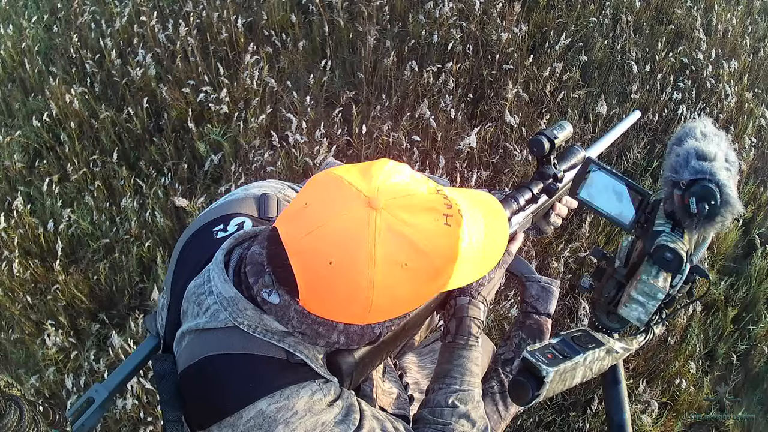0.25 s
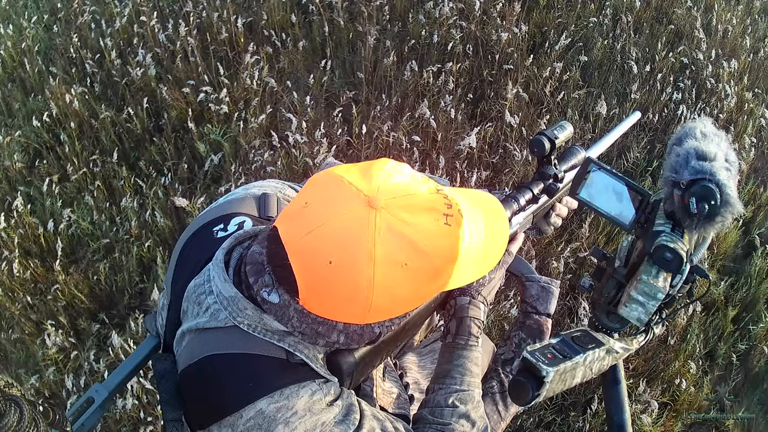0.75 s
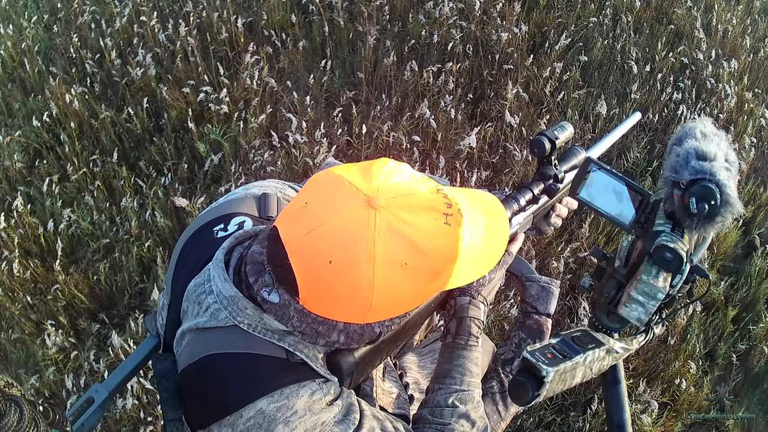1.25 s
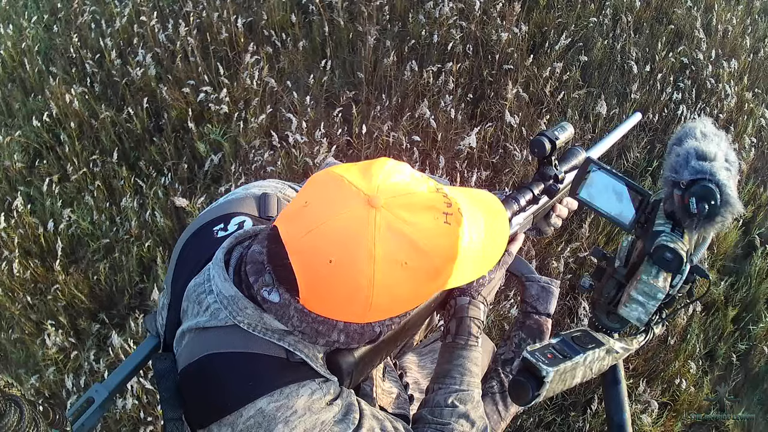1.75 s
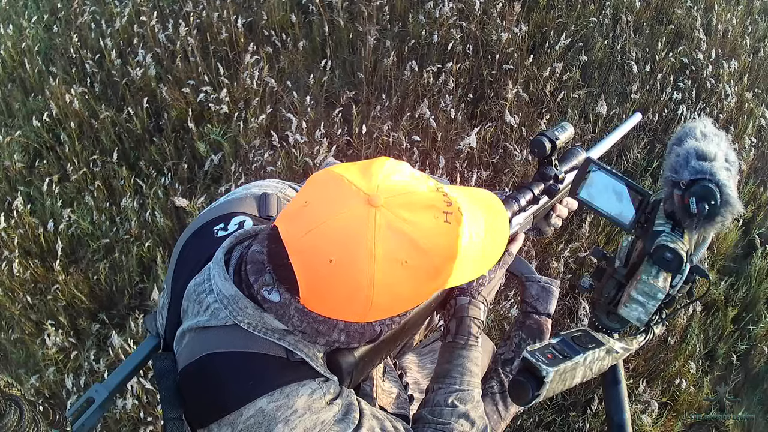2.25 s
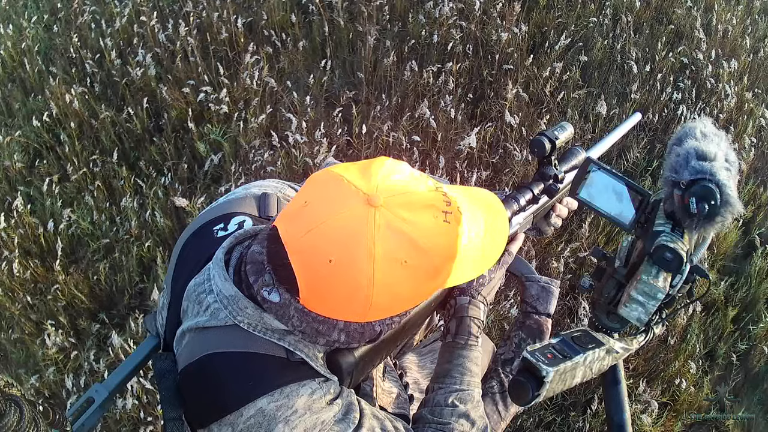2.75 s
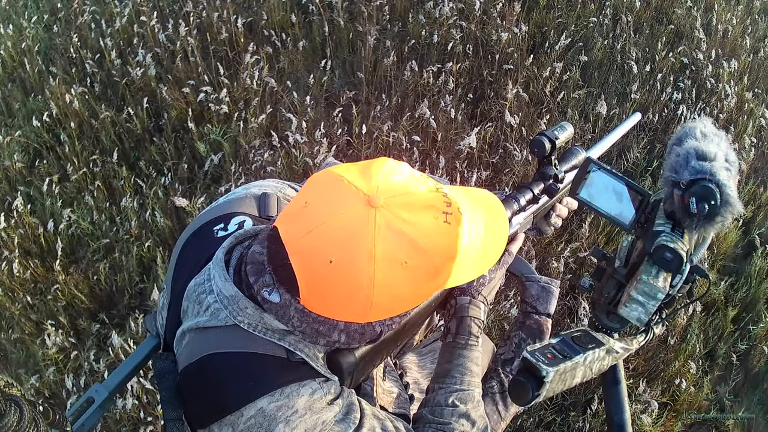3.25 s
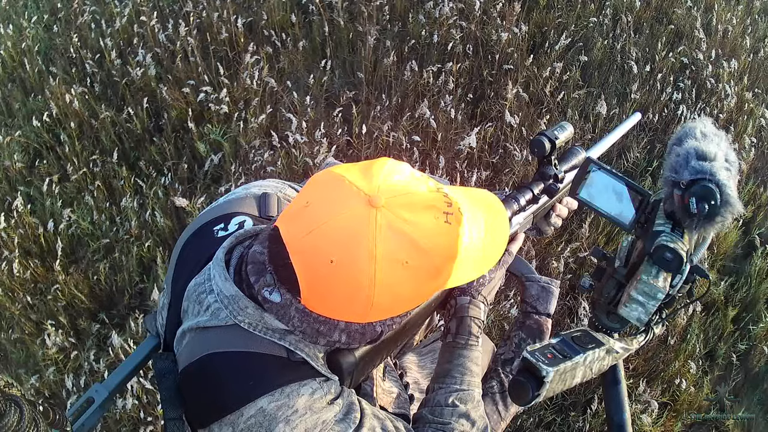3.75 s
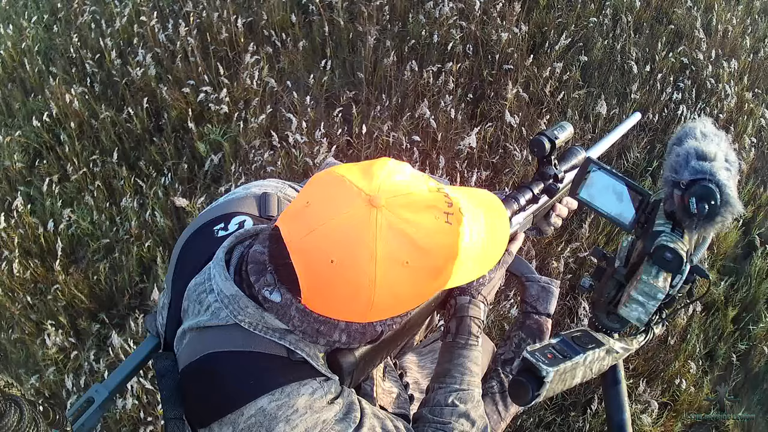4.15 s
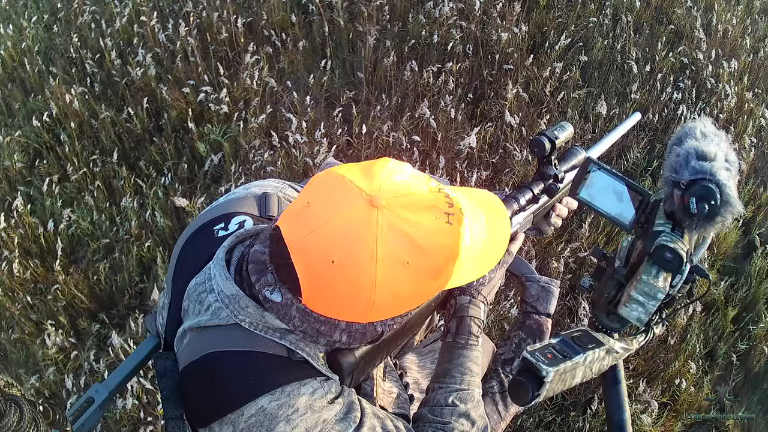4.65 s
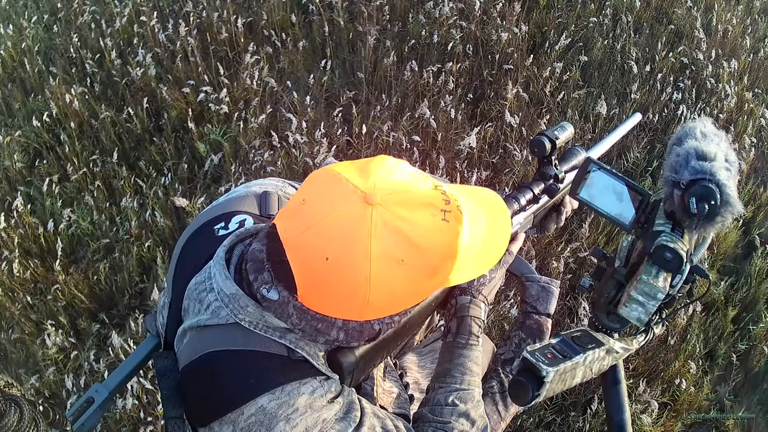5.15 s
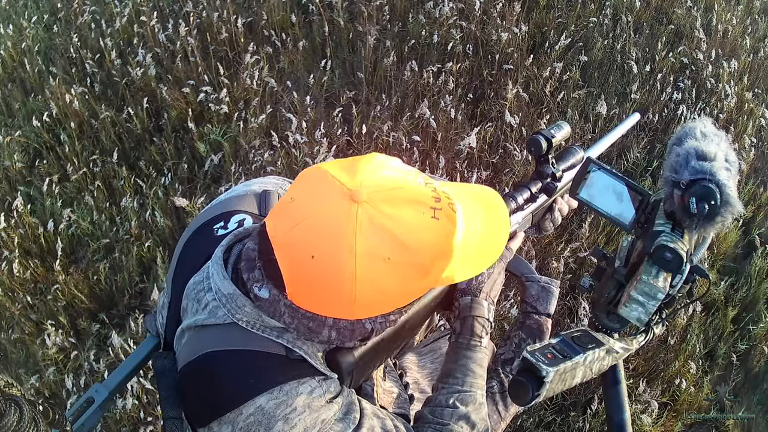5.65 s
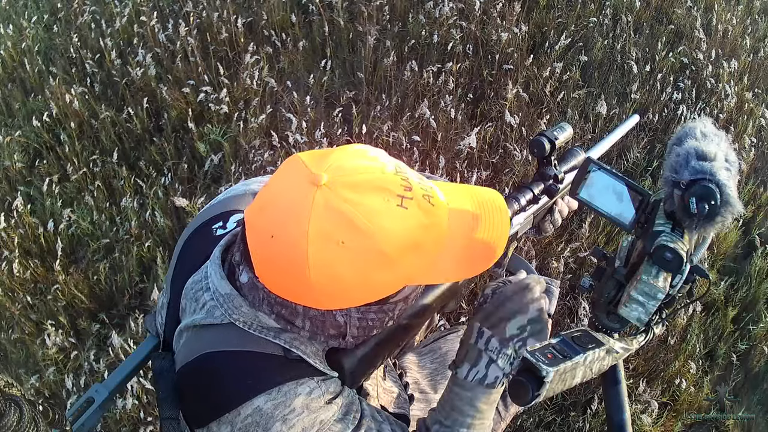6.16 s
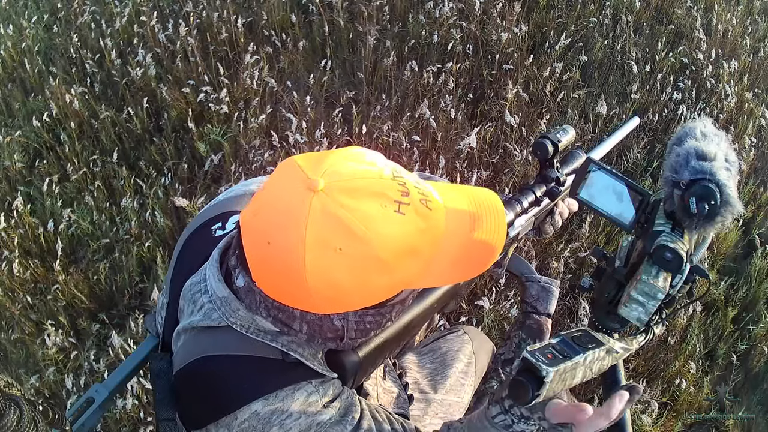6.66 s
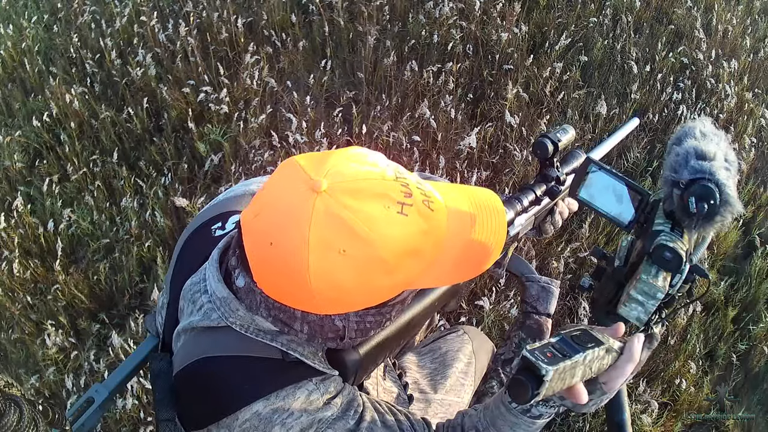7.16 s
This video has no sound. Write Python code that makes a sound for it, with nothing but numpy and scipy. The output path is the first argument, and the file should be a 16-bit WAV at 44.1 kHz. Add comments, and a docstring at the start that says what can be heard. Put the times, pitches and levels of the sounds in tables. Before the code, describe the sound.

Outdoors in a grassy marsh, many birds chip, chuck, whistle and trill near and far, blurred slightly by reeds. Low wind rumble and faint hush stay underneath. After about five seconds, dry clicks and sleeve rustle come very close to the microphone, then hollow knocks, and finally deep thumps shake the mount and overload the input.

```python
"""Marsh birds at dusk

An open marsh heard by a small camera on a tripod, with light wind rumbling on its microphone.
Near birds chip, chuck and whistle with gliding tones, rasp with filtered noise, and trill and buzz
with pulsed tones; the reeds blur them over a far chorus of small whistles and shaped noise.
A hand clicks and scrapes on the gear with short noise bursts and grainy hiss, then knocks the tripod,
which rocks the microphone as a slow, strong sine and overloads the input."""
import sys
import numpy as np
from scipy import signal
from scipy.fft import rfft, irfft, next_fast_len
from scipy.io import wavfile
from scipy.ndimage import uniform_filter1d, map_coordinates

SR = 44100
rng = np.random.default_rng(int(sys.argv[2]) if len(sys.argv) > 2 else 0)


def gain_from_db(level_db):
    """Convert decibel levels to linear amplitude factors (20 dB per decade)."""
    decades = np.asarray(level_db, float) / 20
    return 10 ** decades


def persist_wave(psi):
    """Save psi, clipped to +-1, as 16-bit WAV."""
    counts = np.round(np.clip(psi, -1, 1) * 32767).astype(np.int16)
    wavfile.write(sys.argv[1], SR, np.atleast_2d(counts).T)


N = 327206  # samples in the scene


def unit(x):
    """Scales x to rms 1."""
    return x / np.sqrt(np.mean(x ** 2) + 1e-20)


def along(points, hz):
    """Reads a curve of (hz, value) points on a log frequency axis."""
    f, v = np.transpose(points)
    return np.interp(np.log(hz + 1), np.log(f + 1), v)


def curves(rows):
    """Draws one value per sample for each column after the time."""
    s, *cols = np.transpose(rows)
    return [np.interp(np.arange(N) / SR, s, c) for c in cols]


def wobble(rate, n=N):
    """A smooth random curve with rate knots a second."""
    knots = rng.standard_normal(int(n * rate / SR) + 4)
    return map_coordinates(knots, [np.arange(n) * rate / SR])


def filtered(x, response):
    """Shapes x by a gain that is a function of frequency."""
    m = next_fast_len(len(x) + 8192)
    gain = response(np.fft.rfftfreq(m, 1 / SR))
    return irfft(rfft(x, m) * gain, m)[:len(x)]


def band(x, hz, width_hz):
    """Passes x through one rounded resonance, scaled to rms 1."""
    return unit(filtered(x, lambda f: np.exp(-2 * ((f - hz) / width_hz) ** 2)))


def rush(spectrum, patchy_db):
    """Shaped noise of rms 1, with patches of random gain in time and frequency."""
    z = signal.stft(rng.standard_normal(N + 512), nperseg=512)[2]
    field = rng.standard_normal(z.shape)
    field = uniform_filter1d(uniform_filter1d(field, 5, 0), 12, 1)
    patchy = signal.istft(z * gain_from_db(patchy_db * unit(field)), nperseg=512)[1][:N]
    return unit(filtered(patchy, lambda hz: gain_from_db(along(spectrum, hz))))


def add(track, s, x):
    """Mixes x into track from time s."""
    part = track[max(round(s * SR), 0):][:len(x)]
    part += x[:len(part)]


def span(length_s):
    """Progress from 0 to 1 over a note."""
    return np.linspace(0, 1, max(round(length_s * SR), 8))


def swell(u, edge):
    """Rises and falls over the share edge at each end."""
    return np.sin(np.pi / 2 * np.clip(np.minimum(u, 1 - u) / np.clip(edge, .02, .5), 0, 1)) ** 2


def note(length_s, start_hz, middle_hz, end_hz, flutter_db, flutter_rate, edge):
    """A syrinx tone on a parabola through three pitches, unsteady in level."""
    u = span(length_s)
    hz = start_hz * (1 - u) * (1 - 2 * u) + 4 * middle_hz * u * (1 - u) + end_hz * u * (2 * u - 1)
    hz = hz * (1 + .012 * wobble(60, len(u)))  # the pitch is never quite steady
    tone = np.sin(2 * np.pi * np.cumsum(hz) / SR)
    flutter = gain_from_db(flutter_db * wobble(flutter_rate, len(u)))
    return swell(u, edge) * flutter * tone


def breathy(tone, share):
    """Fuzzes a tone with noise around its pitch by a fast random change of level."""
    return tone * (1 + share * wobble(500, len(tone)))


# Strength of the wind on the microphone port: start_s, level_db
WIND_LEVEL = [(0, -24), (2, -24), (4, -26), (4.9, -27), (5.4, -25), (6.7, -22), (7.0, -24), (7.1, -32)]
# Colour of the buffeting: frequency_hz, relative_level_db (per Hz)
BUFFET_COLOUR = [(2.5, -22), (6, -5), (11, 0), (19, 0), (25, -10), (32, -17), (48, -17), (120, -36),
                 (260, -120)]


def buffeting():
    """Wind on the port makes a low rumble with slow lumps of level."""
    lumps = gain_from_db(0.81 * wobble(8.8))
    return gain_from_db(curves(WIND_LEVEL)[0]) * unit(lumps * rush(BUFFET_COLOUR, patchy_db=1.5))


# Colour of grass, far water and microphone hiss together: frequency_hz, relative_level_db (per Hz)
AIR_COLOUR = [(35, -44.5), (60, -0.5), (130, -8.5), (147, -8), (165, -11), (189, -13), (636, -22),
              (903, -18.5), (1860, -28.5), (2350, -37), (2710, -24), (3420, -44), (4530, -34.5),
              (14900, -39.5), (16000, -46)]


def marsh_air():
    """The steady hush of the marsh is shaped, faintly patchy noise."""
    return gain_from_db(-40) * rush(AIR_COLOUR, patchy_db=0.73)


# Level of the far birds: start_s, level_db
CHORUS_LEVEL = [(0, -40.5), (.54, -41), (.95, -38.5), (1.4, -43), (1.55, -44.5), (2.4, -41), (2.89, -43),
                (3.51, -42), (4.3, -45.5), (4.46, -48.5), (5.31, -40.5), (5.45, -45), (5.6, -41.5),
                (6.61, -44.5), (6.88, -42), (7.42, -54)]
# Colour of the far birds: frequency_hz, relative_level_db (per Hz in the noise)
CHORUS_COLOUR = [(900, -12), (1500, -8), (2200, -3.5), (3000, 1), (3800, -5.5), (4600, -13), (6500, -19.5),
                 (8000, -35)]


def chorus(count=420):
    """Many far birds: short random whistles blurring into a patchy band."""
    whistling = np.zeros(N)
    for place, pitch, life, bend in rng.random((count, 4)):
        hz = 1200 * 3.6 ** pitch
        length_s = 0.0212 + 0.0555 * life
        start_hz, end_hz = hz * (.95 + 0.1044 * bend), hz * (1.04 - 0.093 * bend)
        whistle = note(length_s, start_hz, hz, end_hz, 3.32, 78.0, 0.507)
        add(whistling, place * N / SR, gain_from_db(along(CHORUS_COLOUR, hz)) * whistle)
    blend = .35 * unit(whistling) + rush(CHORUS_COLOUR, patchy_db=2.2)
    return gain_from_db(curves(CHORUS_LEVEL)[0]) * unit(blend)


def chuck(length_s, start_hz, end_hz):
    """A second voice chops a straight glide into strands; the glide grows louder as it climbs."""
    glide = note(length_s, start_hz, (start_hz + end_hz) / 2, end_hz, 2.5, 400, .35)
    glide = glide * (.4 + .6 * span(length_s))
    return glide * (.6 + np.cos(2 * np.pi * 420 * np.arange(len(glide)) / SR))


# Quick hoarse upward chucks: start_s, length_s, start_hz, end_hz, level_db
CHUCK_NOTES = [(.005, .02, 1933, 2250, -34), (.897, .008, 3100, 3880, -33), (1.029, 0.029, 760, 2400, -31),
               (1.043, 0.0178, 3300, 3610, -26.5), (1.786, .018, 2760, 3460, -38),
               (1.994, 0.012, 1513, 2300, -32), (2.064, .017, 1970, 4070, -25.5),
               (2.763, 0.011, 1950, 3150, -31), (3.501, .025, 1876, 3840, -30.5),
               (4.32, .02, 1510, 3770, -25.5), (4.323, .013, 2420, 4600, -27),
               (4.508, .022, 1296, 4410, -27), (6.147, 0.013, 1470, 2500, -34)]


def chucks():
    """Hoarse upward glides, each chopped by a second voice."""
    out = np.zeros(N)
    for s, length_s, start_hz, end_hz, db in CHUCK_NOTES:
        add(out, s, gain_from_db(db) * chuck(length_s, start_hz, end_hz))
    return out


# Whistles: start_s, length_s, pitch_hz, slide_hz (end minus start), level_db
WHISTLE_NOTES = [(.005, 0.036, 1320, 0, -41), (0.048, 0.049, 1330, -210, -40), (.14, 0.04, 2860, -80, -40),
                 (.25, .063, 2850, 0, -40.5), (0.348, .077, 1720, 0, -44), (0.361, 0.087, 1960, 30, -49),
                 (.5, .1, 3720, -560, -49), (.555, 0.059, 3187, -42, -39), (0.56, .136, 1324, -170, -38.5),
                 (0.717, .04, 1940, 60, -43), (.765, 0.054, 1566, -95, -39.5),
                 (0.785, 0.056, 3020, -60, -38), (0.828, 0.044, 1740, 100, -42),
                 (0.858, .042, 1422, -55, -41.5), (1.088, .03, 4670, -120, -52),
                 (1.273, 0.045, 4590, -140, -53), (1.365, .054, 4600, -180, -54),
                 (1.47, .08, 4520, -270, -53), (1.496, .074, 2970, 20, -39.5), (1.9, 0.12, 1950, -100, -51),
                 (2.129, 0.11, 1537, -230, -40), (2.245, 0.08, 2070, -170, -42),
                 (2.788, 0.104, 3270, 100, -39), (2.903, 0.085, 1997, 164, -49),
                 (4.233, .05, 3768, -65, -34), (4.64, .09, 2140, -100, -52),
                 (4.673, 0.041, 4000, -165, -48.5), (4.732, 0.14, 2005, -72, -46),
                 (4.989, .082, 1070, -17, -41.5), (5.082, 0.1, 2140, -290, -44.5),
                 (5.435, .034, 7250, -150, -52), (5.577, .077, 3060, -51, -40),
                 (7.402, 0.019, 1330, 591, -34.5)]


def whistles():
    """Clear syrinx tones that slide evenly, with some breath around them."""
    out = np.zeros(N)
    for s, length_s, hz, slide_hz, db in WHISTLE_NOTES:
        tone = note(length_s, hz - slide_hz / 2, hz, hz + slide_hz / 2, 2.2, 110, .17)
        add(out, s, gain_from_db(db) * breathy(tone, .35))
    return out


# Fading of the reed beds: frequency_hz, t60_s
REED_FADE = [(1000, 0.58), (6000, .75), (12000, .15)]


def reeds(x, count=30):
    """Near stems smear calls over a few ms and reed beds add a fading blur.
    The blur is built from overlapping random tails, so no pitch is favoured for long."""
    out, hop = np.zeros(N), N // count
    for start in range(0, N - hop, hop):
        hz, t, z = signal.stft(rng.standard_normal(SR // 2), SR, nperseg=256)
        beds = gain_from_db(-60 * t / along(REED_FADE, hz)[:, None])
        stems = gain_from_db(8 - 60 * t / 0.037)
        tail = signal.istft(z * (beds + stems), SR, nperseg=256)[1]
        # overlapping pieces crossfade from one random tail to the next
        piece = x[start:start + 2 * hop] * np.hanning(2 * hop)[:N - start]
        add(out, start / SR + .003, signal.fftconvolve(piece, tail / np.linalg.norm(tail)))
    return out


# Short scratchy rasps: start_s, length_s, centre_hz, level_db
RASP_NOTES = [(0.018, 0.038, 5200, -42), (1.022, .018, 5200, -42.5), (1.389, .091, 6650, -48.5),
              (1.777, .038, 3270, -46), (1.855, .044, 3740, -38.5), (1.86, .035, 1840, -38.5),
              (1.979, .059, 3400, -43.5), (2.009, .039, 1297, -43), (3.429, 0.1, 2093, -44),
              (4.154, .04, 3860, -42.5), (4.243, 0.053, 3950, -40.5), (4.253, .054, 6100, -44.5),
              (4.447, .05, 3535, -43.5), (5.331, 0.057, 930, -44.5), (5.53, .042, 4000, -38),
              (5.656, .051, 3840, -41.5), (5.753, 0.034, 3000, -38.5), (5.818, 0.026, 3700, -37.5),
              (6.754, .027, 1510, -34), (7.368, .031, 2790, -42)]


def rasps():
    """Noise with fast uneven slips of level, in one throat resonance."""
    out = np.zeros(N)
    for s, length_s, hz, db in RASP_NOTES:
        u = span(length_s)
        slips = rng.standard_normal(len(u)) * gain_from_db(1.1 * wobble(274.0, len(u)))
        throat_width_hz = min(0.54 * hz, 1120)
        add(out, s, gain_from_db(db) * swell(u, 0.11) * band(slips, hz, throat_width_hz))
    return out


CONTACT_T = np.arange(SR // 20) / SR  # time within one contact, s


def contact_noise():
    """White noise as long as one contact."""
    return rng.standard_normal(len(CONTACT_T))


def press():
    """The level of one contact: a fast rise, then a dry decay after a few ms."""
    rise = 1 - np.exp(-CONTACT_T / 0.00059)
    return rise * gain_from_db(-60 * np.maximum(CONTACT_T - .004, 0) / 0.018)


# Colour of cloth and skin on the gear: frequency_hz, relative_level_db (per Hz)
CLOTH_COLOUR = [(120, -3.5), (400, 4.5), (900, 5), (2000, 3), (5000, 0.5), (10000, -10.5), (16000, -26)]


def chatter():
    """The soft broad noise within each contact."""
    return 0.38 * unit(filtered(contact_noise(), lambda f: gain_from_db(along(CLOTH_COLOUR, f))))


# Dry ticks of the hand on the gear: start_s, level_db, centre_hz
TICK_HITS = [(.036, -21.5, 4230), (.241, -20.5, 3440), (.795, -38, 7010), (5.012, -30, 3140),
             (5.038, -24.5, 2760), (5.258, -34, 6000), (5.442, -23, 3580), (5.613, -11, 2652),
             (5.651, -17.5, 4800), (5.659, -26, 3770), (5.682, -38, 9000), (5.928, -18, 6200),
             (6.172, -36, 9000), (6.184, -15.5, 3800), (6.198, -15.5, 3700), (6.707, -24.5, 4200),
             (6.749, -16.5, 5130), (6.781, -21.5, 3600), (6.858, -33, 6000), (7.007, -25.5, 5160),
             (7.04, -23, 5400), (7.179, -34, 5000), (7.238, -21.5, 4230), (7.27, -33, 5500),
             (7.323, -35, 5000), (7.341, -25, 4170)]


def ticks():
    """Each dry contact is a burst around one pitch, with chatter and a bright crack, stronger in high ticks."""
    out = np.zeros(N)
    for s, db, hz in TICK_HITS:
        crack_db = -5 + 7.5 * np.log2(hz / 4000) - 60 * CONTACT_T / 0.035  # t60 0.035 s
        crack = gain_from_db(crack_db) * band(contact_noise(), 6500, 13000)
        tick = band(contact_noise(), hz, 0.6 * hz)
        add(out, s, gain_from_db(db - 10.0) * press() * (tick + chatter() + crack))
    return out


def chip(length_s, pitches_hz):
    """A thin clear tone through start, middle and end pitch."""
    return note(length_s, *pitches_hz, 3, 300, .2)


# Thin chips that hold and drop: start_s, length_s, middle_hz, level_db
CHIP_NOTES = [(0.149, 0.026, 5880, -37.5), (.322, 0.024, 6000, -47.5), (.553, .02, 5700, -51),
              (.978, .027, 5970, -45.5), (1.572, .037, 5860, -45.5), (2.957, .018, 6000, -51),
              (3.235, 0.017, 6200, -43), (3.566, 0.028, 5470, -40), (3.852, .029, 5530, -43),
              (4.16, .024, 5840, -46.5), (4.62, .016, 5850, -51.5), (5.133, 0.03, 5940, -44),
              (6.108, 0.043, 5820, -33.5), (6.106, 0.017, 6750, -44), (6.654, 0.028, 5720, -46)]


def chips():
    """Thin tones that hold their pitch and then drop, further in longer chips."""
    out = np.zeros(N)
    sag_hz_per_s = 37000  # drop from middle to end, per second of length
    for s, length_s, hz, db in CHIP_NOTES:
        add(out, s, gain_from_db(db) * chip(length_s, (1.01 * hz, hz, hz - sag_hz_per_s * length_s)))
    return out


def pips():
    """One faint level pip at a steady rate, with scattered loudness."""
    out = np.zeros(N)
    first_s, every_s, length_s, hz = .178, .1991, 0.035, 5580
    for s in np.arange(first_s, N / SR, every_s):
        db = -56 + 2.5 * rng.standard_normal()
        add(out, s, gain_from_db(db) * chip(length_s, (hz, hz, hz)))
    return out


# Trills: start_s, length_s, pitch_hz, rate_per_s, fall_hz (of each note, negative rises), level_db
TRILL_NOTES = [(.56, .55, 3200, 25, 60, -42), (2.3, .44, 3030, 22.5, 350, -35.5),
               (2.3, .46, 4850, 21, -700, -43.5), (1.089, .377, 2830, 37.5, 900, -35),
               (2.865, .76, 2790, 23.77, 120, -38.5)]


def trills():
    """One gliding note repeated at a steady rate while the whole trill fades slightly."""
    out = np.zeros(N)
    for s, length_s, hz, rate, fall_hz, db in TRILL_NOTES:
        u = span(length_s)
        beat = u * length_s * rate % 1
        pitch_hz = hz * (1 + .01 * wobble(90, len(u))) + fall_hz * (.5 - beat)
        level = swell(u, .05) * swell(beat, .4) * gain_from_db(db + 1 - 2 * u + 1.5 * wobble(60, len(u)))
        tone = np.sin(2 * np.pi * np.cumsum(pitch_hz) / SR)
        add(out, s, level * breathy(tone, .35))
    return out


# Chucks of a slow rattle: start_s, level_db
RATTLE_NOTES = [(.752, -31), (.862, -38), (.98, -39), (1.073, -32), (1.165, -41), (1.255, -34),
                (1.346, -34), (1.444, -40), (1.548, -39)]


def rattle():
    """One low chuck repeated slowly."""
    out = np.zeros(N)
    for s, db in RATTLE_NOTES:
        add(out, s, gain_from_db(db) * chuck(0.014, 1810, 2550))
    return out


# Long grating calls: start_s, length_s, centre_hz, throbs_per_s, level_db (at the start)
GRATE_NOTES = [(.762, 0.96, 2780, 37.5, -51), (2.298, .459, 3250, 22.4, -35),
               (2.299, .48, 4800, 20.7, -46.5), (5.214, 0.45, 3350, 41, -43)]


def grates():
    """Noise in one throat resonance, pulsed by fast slips and a slower throb as it fades."""
    out = np.zeros(N)
    for s, length_s, hz, throb, db in GRATE_NOTES:
        u = span(length_s)
        slip_db = 8 * np.cos(2 * np.pi * 119 * u * length_s)
        throb_db = 2 * np.cos(2 * np.pi * throb * u * length_s)
        slips = rng.standard_normal(len(u)) * gain_from_db(slip_db + throb_db)
        add(out, s, gain_from_db(db - 6 * u) * swell(u, .02) * band(slips, hz, 770))
    return out


# Held buzzy notes: start_s, length_s, lowest_hz, spacing_hz, level_db (of the lower two tones)
BUZZ_NOTES = [(.84, .68, 2660, 480, -41), (3.78, .4, 2640, 440, -48), (4.81, .3, 2680, 600, -48),
              (5.215, .36, 2590, 385, -37.5)]


def buzzes():
    """A stack of three evenly spaced tones, beaded by a fast pulse of level."""
    out = np.zeros(N)
    beads_per_s = 86
    for s, length_s, hz, spacing_hz, db in BUZZ_NOTES:
        bead = .6 + .4 * np.cos(2 * np.pi * beads_per_s * span(length_s) * length_s)
        for k, tone_db in enumerate((0, 0, -6)):
            tone_hz = hz + k * spacing_hz
            tone = note(length_s, tone_hz * 1.005, tone_hz, tone_hz * .99, 1.5, 70, .05)
            add(out, s, gain_from_db(db + tone_db) * bead * breathy(tone, .175))
    return out


# One bird's loud two-voiced chip: start_s, level_db (of the low voice)
DOUBLE_NOTES = [(1.124, -31.5), (2.56, -32), (3.962, -31.5), (5.401, -31.5)]


def double_chips():
    """Two voices at once: a low one arches up and down, a softer high one enters just after and falls."""
    out = np.zeros(N)
    length_s, upper_lag_s, upper_db = 0.0285, 0.0026, -9
    for s, db in DOUBLE_NOTES:
        add(out, s, gain_from_db(db) * chip(length_s, (4770, 5720, 4600)))
        add(out, s + upper_lag_s, gain_from_db(db + upper_db) * chip(length_s, (6450, 6300, 5400)))
    return out


# Thin chips that rise: start_s, level_db
RISER_NOTES = [(1.773, -51), (3.475, -55), (4.232, -48), (5.38, -41), (6.625, -52)]


def risers():
    """Thin tones that climb all the way."""
    out = np.zeros(N)
    for s, db in RISER_NOTES:
        add(out, s, gain_from_db(db) * chip(0.0256, (6000, 6540, 7100)))
    return out


# Thin chips that dive from the start: start_s, length_s, start_hz, end_hz, level_db
DIVE_NOTES = [(2.21, .027, 7000, 4900, -45), (2.292, .017, 6200, 4600, -39), (3.2, .015, 6050, 5250, -48),
              (3.856, 0.025, 6500, 5600, -50)]


def dives():
    """Thin tones that fall in a straight line."""
    out = np.zeros(N)
    for s, length_s, start_hz, end_hz, db in DIVE_NOTES:
        add(out, s, gain_from_db(db) * chip(length_s, (start_hz, (start_hz + end_hz) / 2, end_hz)))
    return out


# Sleeve and glove sliding: start_s, level_db
SCRAPE_LEVEL = [(5.3, -45.5), (5.91, -50), (6.38, -49.5), (6.71, -43.5), (6.86, -45.5), (7.42, -42.5)]


def scrape():
    """Cloth slides in grains: shaped noise with slow and fast random changes of level."""
    grains = gain_from_db(1.04 * wobble(40) + 3.8 * wobble(250))
    slide = unit(rush(CLOTH_COLOUR, patchy_db=0) * grains)
    sliding = np.arange(N) > SCRAPE_LEVEL[0][0] * SR
    return gain_from_db(curves(SCRAPE_LEVEL)[0]) * sliding * slide


# Dull knocks on the hollow parts: start_s, level_db, pitch_hz
KNOCK_HITS = [(5.652, -23, 1510), (6.18, -24, 2000), (6.707, -20, 1390), (6.741, -18.5, 1910),
              (6.749, -6.5, 2060), (6.779, -18, 920), (6.998, -25, 990), (7.052, -23, 2260),
              (7.068, -28, 2280), (7.087, -20, 1390), (7.223, -11.5, 1844), (7.247, -27.5, 1900),
              (7.258, -31, 1950), (7.368, -28, 1372)]


def knocks():
    """Soft knocks are dead bursts of noise; harder ones ring more as a pure tone."""
    out = np.zeros(N)
    dead_db, rings_db = -23, -13.5  # all noise below the first, all ring above the second
    for s, db, hz in KNOCK_HITS:
        hollow = np.clip((db - dead_db) / (rings_db - dead_db), 0, 1)
        ring = 1.4 * np.sin(2 * np.pi * hz * CONTACT_T)
        knock = hollow * ring + (1 - hollow) * band(contact_noise(), hz, 800)
        add(out, s, gain_from_db(db - 7.5) * press() * (knock + gain_from_db(-6) * chatter()))
    return out


# Rocking of the tripod: start_s, pitch_hz, level_db
ROCKING = [(7.04, 20, -22), (7.075, 26, -7.5), (7.125, 14.4, -1), (7.175, 21.2, -11), (7.21, 12.7, 0),
           (7.265, 18.96, -15.5), (7.33, 13, -.7), (7.38, 10.4, -3.5), (7.41, 15.5, -17)]


def tripod():
    """The knocked tripod rocks the microphone below the range of pitch, and its legs grumble along."""
    hz, db = curves(ROCKING)
    moving = np.arange(N) > ROCKING[0][0] * SR
    sway = np.sin(2 * np.pi * np.cumsum(hz * moving) / SR)
    grumble = gain_from_db(-30) * band(rng.standard_normal(N), 56, 110)
    return -gain_from_db(db) * moving * (sway + grumble)


def scene():
    """Birds in the reeds, gear and wind at the microphone."""
    tonal = chucks() + whistles() + chips() + pips() + rattle() + double_chips() + risers() + dives()
    birds = tonal + rasps() + trills() + grates() + buzzes()
    handling = ticks() + scrape() + knocks()
    wind = buffeting() + marsh_air()
    return (birds + gain_from_db(-4.5) * reeds(birds) + chorus() + handling + tripod() + wind)[None]


def top_cut(x):
    """Nothing passes above the cut-off."""
    return signal.sosfilt(signal.butter(12, 16430, fs=SR, output="sos"), x)


def record(dry):
    """The mix keeps nothing above 15.9 kHz, and the input clips on the biggest swing."""
    limited = filtered(dry[0], lambda hz: hz < 15900)[None]
    clipped = np.clip(limited, -.93, .93)
    return top_cut(clipped)


dry = scene()
out = record(dry)
persist_wave(out)
```